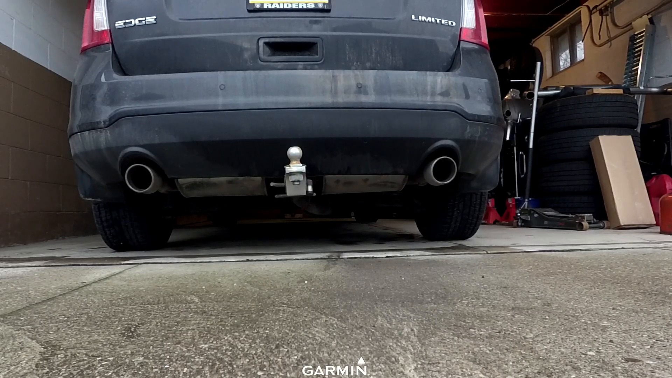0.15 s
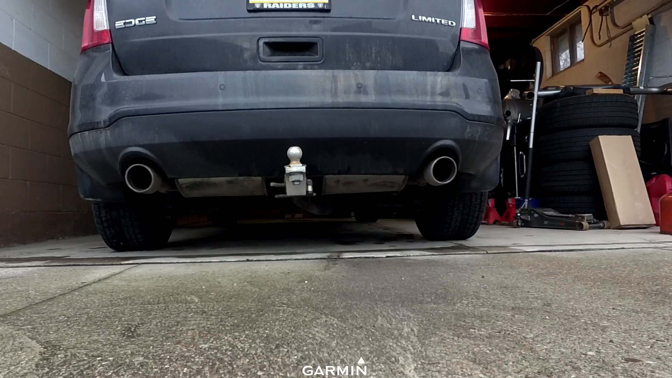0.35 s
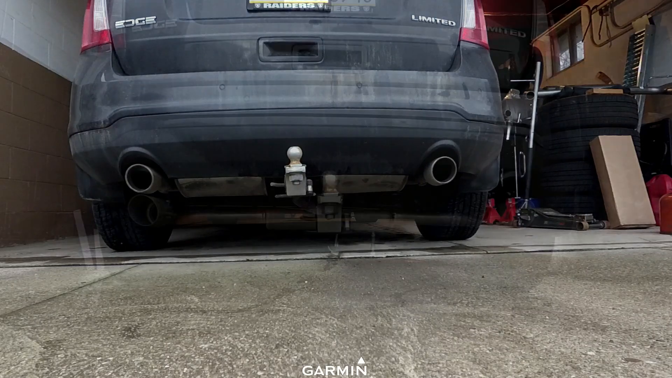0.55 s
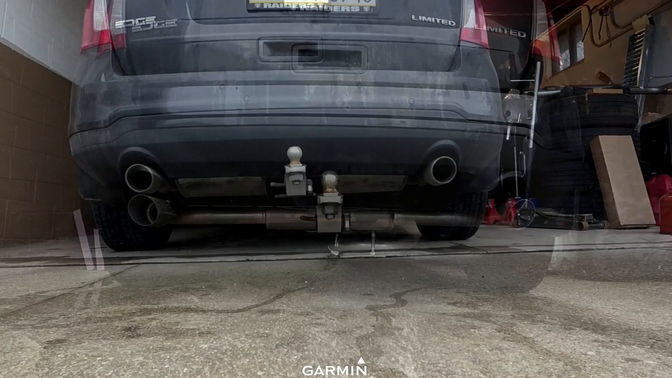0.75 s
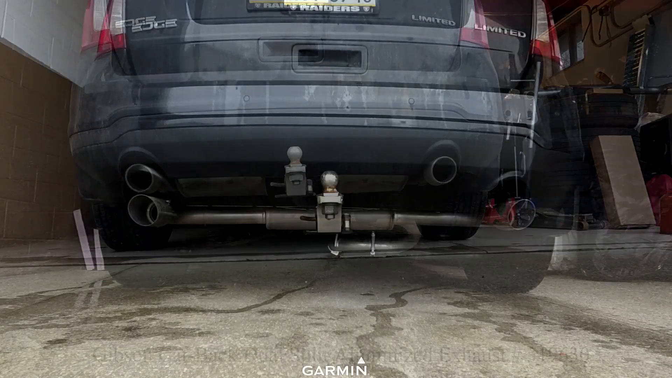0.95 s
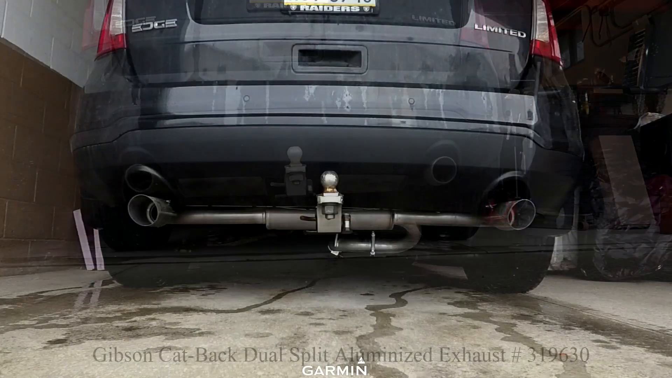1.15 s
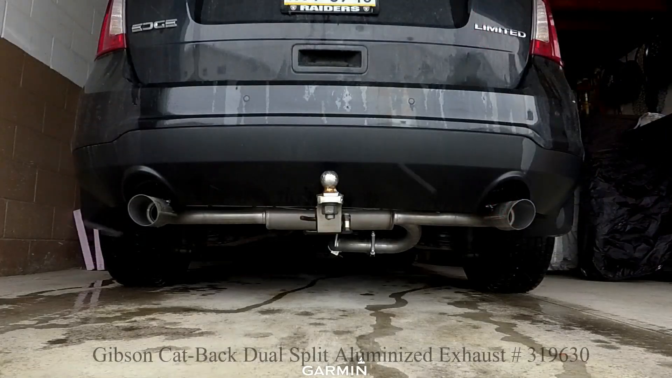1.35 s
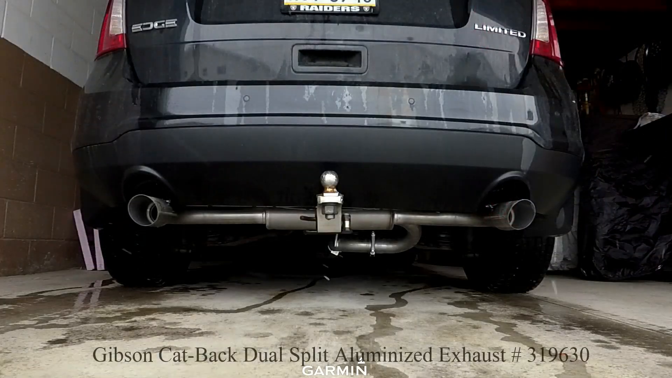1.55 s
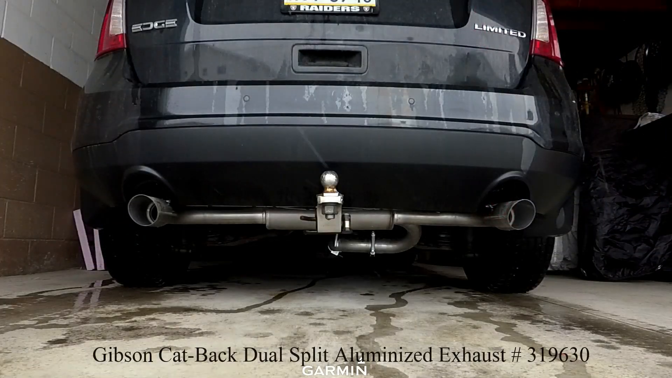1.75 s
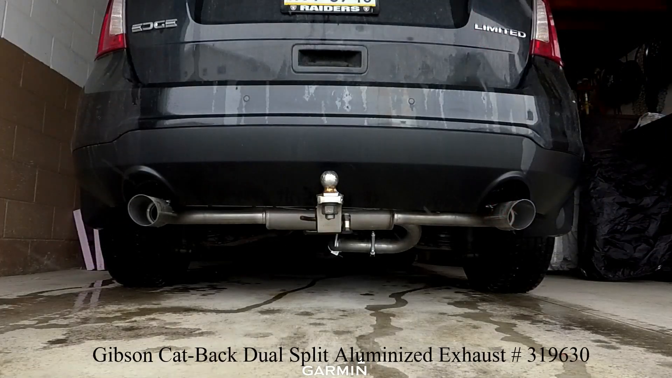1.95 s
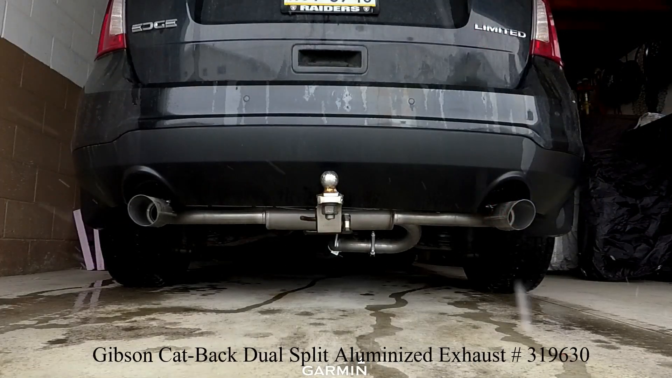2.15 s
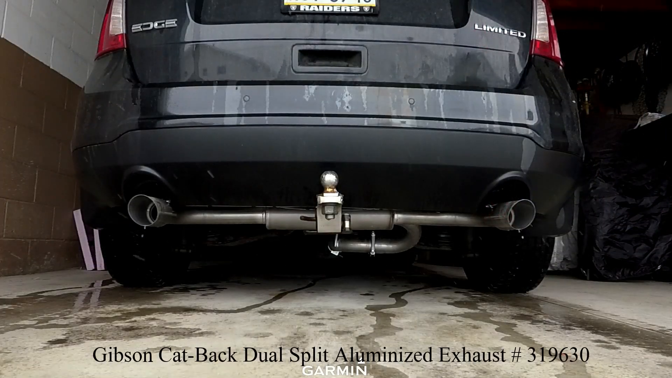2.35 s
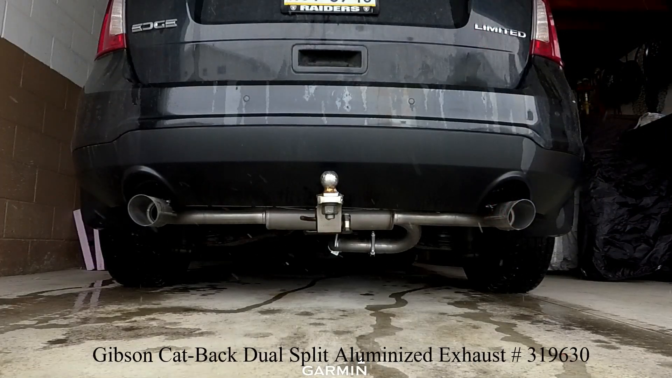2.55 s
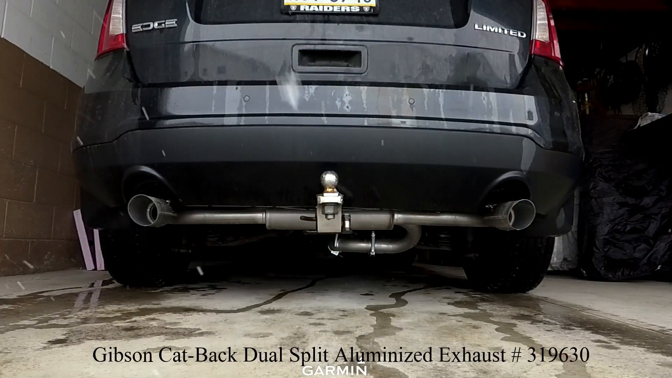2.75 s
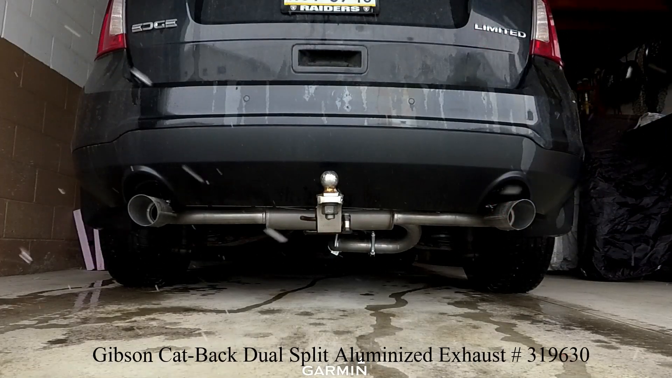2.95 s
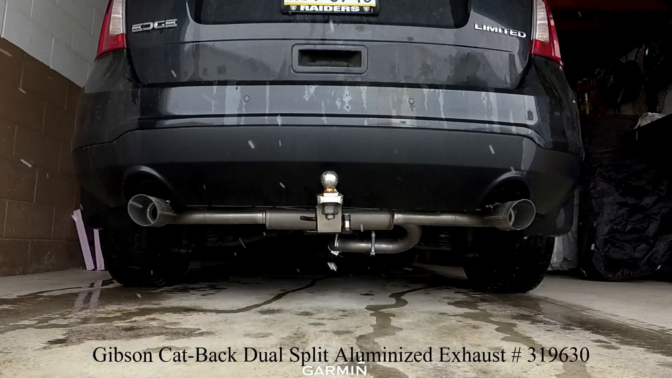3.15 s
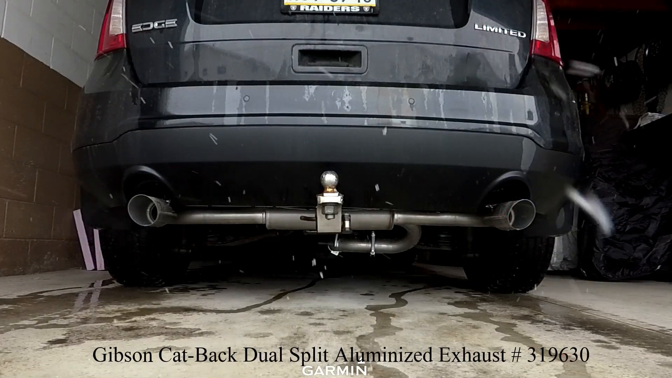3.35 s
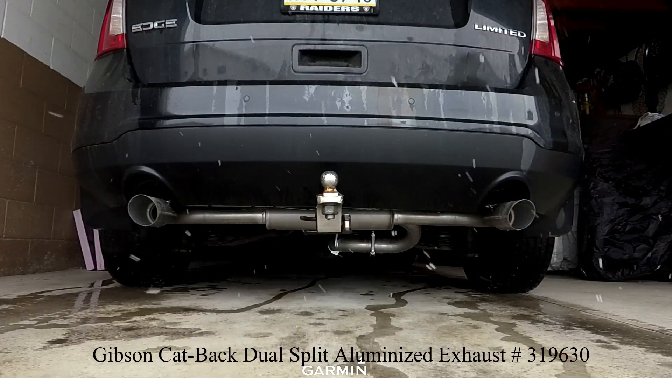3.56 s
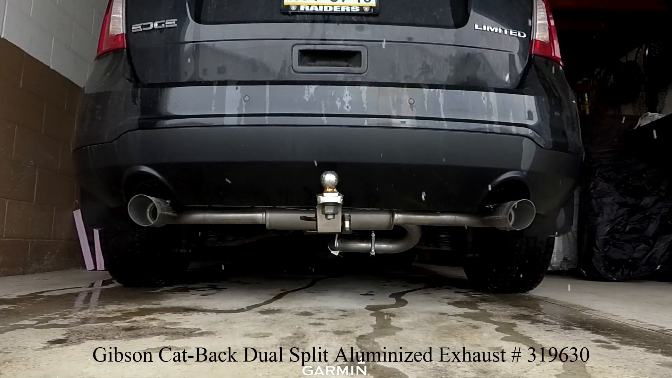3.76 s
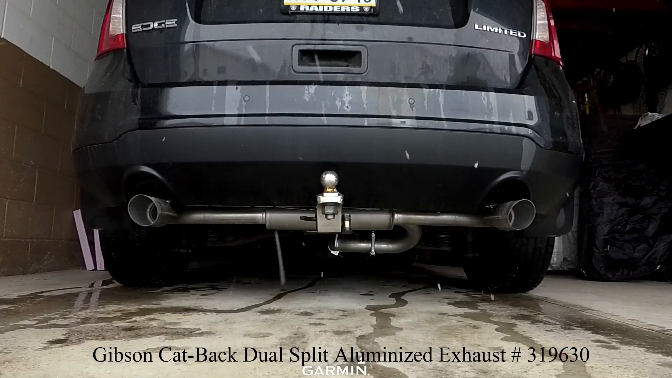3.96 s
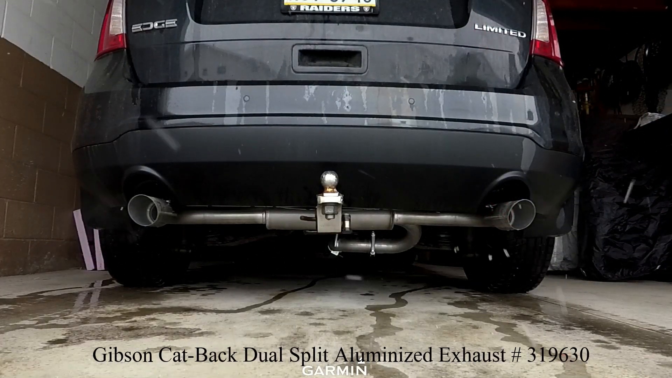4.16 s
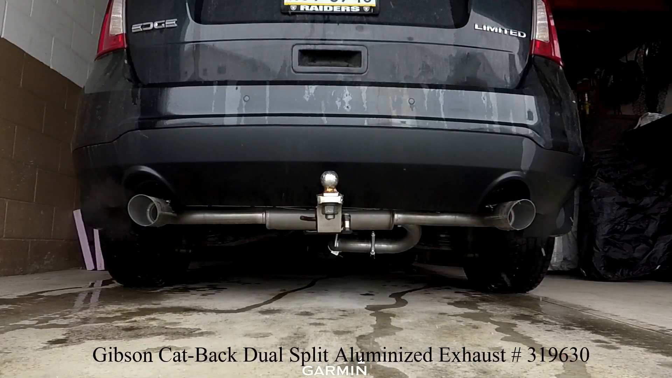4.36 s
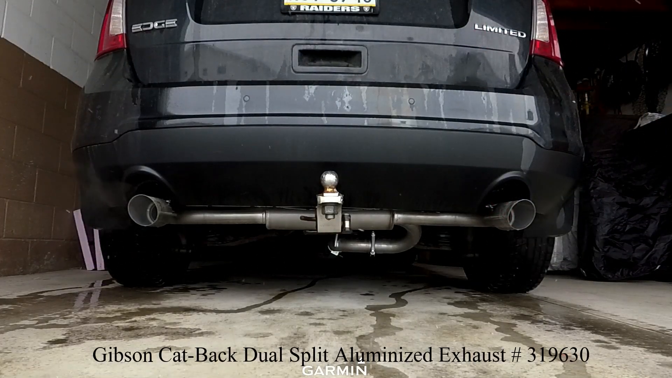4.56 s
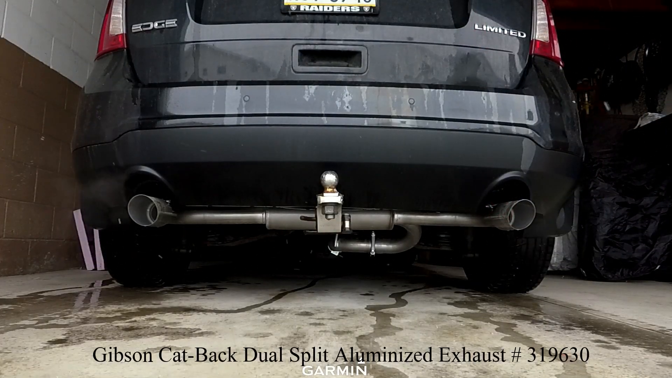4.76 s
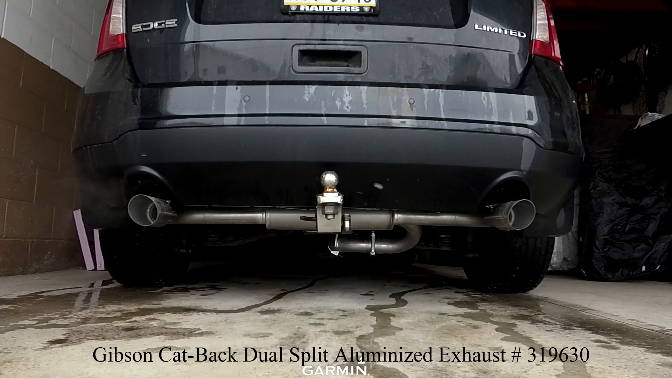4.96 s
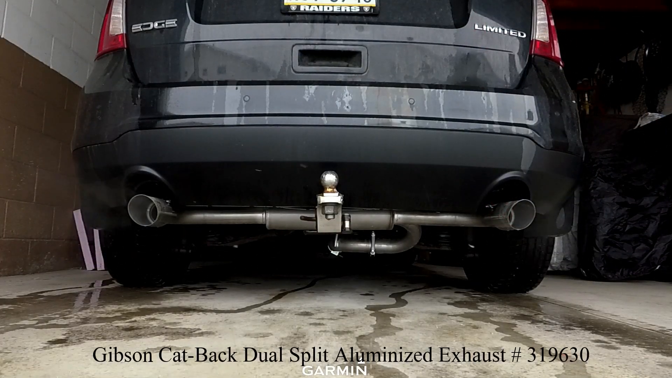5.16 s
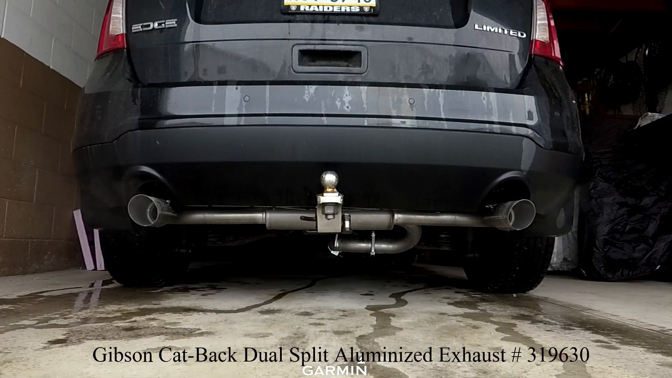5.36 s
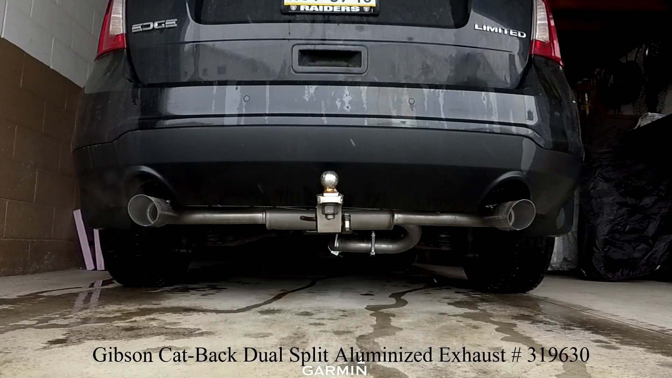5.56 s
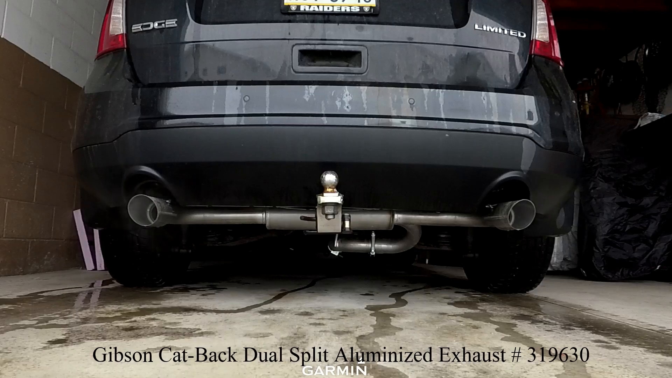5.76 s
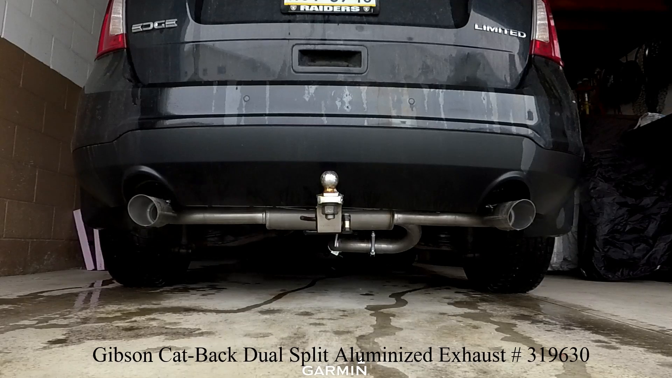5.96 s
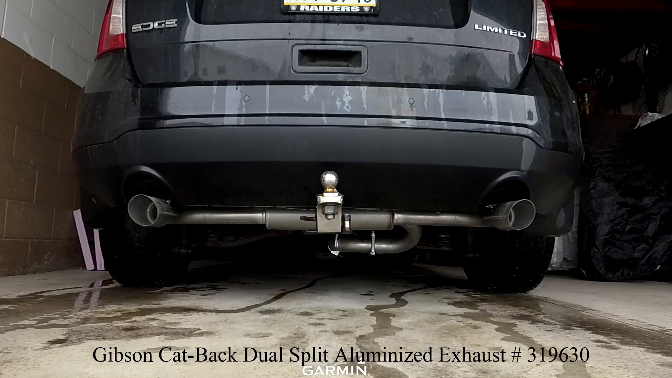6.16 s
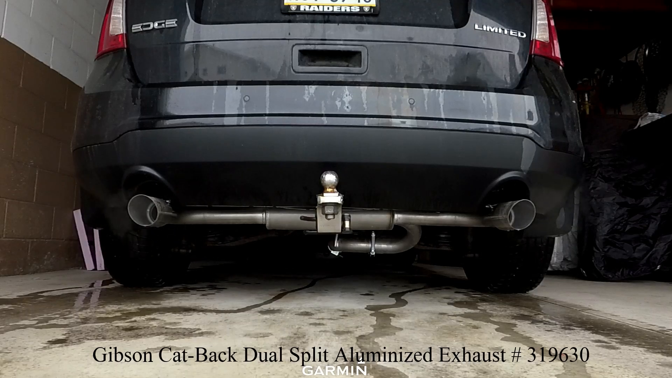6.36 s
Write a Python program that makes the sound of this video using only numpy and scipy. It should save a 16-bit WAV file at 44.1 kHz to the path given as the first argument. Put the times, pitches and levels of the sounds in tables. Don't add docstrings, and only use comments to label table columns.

```python
import sys
import numpy as np
from scipy import signal
from scipy.fft import rfft, irfft, next_fast_len
from scipy.io import wavfile
from scipy.ndimage import uniform_filter1d

SR = 44100
rng = np.random.default_rng(int(sys.argv[2]) if len(sys.argv) > 2 else 0)


def store_wav(level_fs):
    pcm = np.round(np.clip(np.atleast_2d(level_fs), -1, 1) * 32767)
    wavfile.write(sys.argv[1], SR, pcm.T.astype(np.int16))


def invert_db(level):
    return 10 ** (np.asarray(level, dtype=float) / 20)


N = 282240
T = np.arange(N) / SR

CHANGE_S = 1.4272

# start t/s, hold t/s, level/dB
GUSTS = [
    (0.028, .04, -46),
    (0.527, .04, -41),
    (0.847, .02, -20.5),
    (0.899, 0.036, -23.5),
    (0.97, .06, -23.5),
    (1.052, 0.041, -19),
    (1.277, .05, -21.5),
    (1.367, .07, -27),
    (1.19, 0.083, -35.5),
    (4.437, .02, -29),
]
# t/s, peak level/dB, f/Hz
EDDY_BURSTS = [(0.546, -12.5, 169), (0.871, -13, 224), (0.915, 1, 178), (0.931, -6, 176),
               (0.947, -3.5, 226), (0.978, -5, 173), (1.039, -4, 221), (1.059, -7.5, 203),
               (1.075, -4.5, 221), (1.096, -10, 205), (1.135, -28, 180), (1.309, -7.5, 215),
               (1.373, -15, 169), (1.386, -1, 207), (4.45, -26, 245), (4.468, -9, 261), (4.487, -17, 264)]
# f/Hz, level/dB per Hz
SOFT_GUST_COLOUR = [(15, -57), (25, -7), (48, -14.5), (81, -6.5), (146, -8), (227, -16.5), (340, -26),
                    (400, -29), (520, -55), (880, -120)]
HARD_GUST_COLOUR = [(15, -31), (25, -23), (212, 2), (375, -8), (548, -15), (663, -17), (706, -10),
                    (764, -28), (854, -15.5), (1100, -30.5), (1430, -63), (2420, -120)]
BREEZE_DB, BREEZE_LUMPS_DB, GUST_RISE_S, GUST_FALL_S = -35, 2.5, 0.013, 0.11

# f/Hz, level/dB per Hz
TRAFFIC_COLOUR = [(88, -22), (150, -9), (269, -6), (292, -15), (328, -8.5), (435, -10.5), (659, -10.5),
                  (693, -9.5), (753, -8), (819, -10.5), (1330, -15.5), (3310, -22), (8000, -42.5),
                  (10400, -69), (17600, -120)]
TRAFFIC_DB, PASSING_DB, PASSING_FADE_S = -39, 5, 0.44
# f/Hz, level/dB per Hz
RUMBLE_COLOUR = [(12, -31), (20, 0.5), (92, -9), (630, -13), (690, -8), (791, -18), (907, -7), (1020, -15),
                 (1310, -21.5), (3120, -31), (4700, -39), (6110, -83), (10300, -120)]
RUMBLE_DB, RUMBLE_RISE_DB_PER_S, RUMBLE_END_S = -39.5, 11.5, 2.41

# f/Hz, level/dB per Hz
HISS_COLOUR = [(2760, -49), (4700, -14.5), (6290, 0), (6740, -3.5), (7220, -4.5), (10400, -1),
               (12800, -8.5), (15300, -7.5)]
HISS_DB, HISS_FIRST_DB, HISS_SWELL_DB = -65, -4.5, 3
DUCK_DB, DUCK_FROM_S, DUCK_FALL_S, DUCK_RECOVER_S = -7.5, 2.48, 0.9, 1.38

# t/s, f/Hz, level/dB
WHISTLES = [
    [(.62, 5930, -68), (.9, 5950, -64), (1.17, 5970, -68)],
    [(3.0, 5980, -73), (3.6, 6200, -68), (4.0, 6560, -66), (4.25, 6720, -63), (4.7, 6720, -69),
     (6.4, 6720, -71)],
]

# t/s, peak level/dB, decay to -60 dB t/s
COMPRESSIONS = [
    (1.619, 6, 0.23),
    (1.704, -9, 0.76),
    (1.749, -7, 0.41),
    (1.883, 1, 0.27),
    (1.982, 0.5, 0.29),
    (2.078, 3.5, 0.14),
    (2.162, 2, 0.25),
    (2.305, -1.5, 0.2),
]
# f/Hz, level/dB per Hz
STARTER_COLOUR = [(280, -29), (450, -32), (620, -16), (770, -0.5), (1100, -8), (1300, -1), (1650, -13),
                  (2800, -9.5), (4100, -8), (4750, -12.5), (5050, -20), (9300, -39.5), (11500, -40),
                  (14000, -66)]
# f/Hz, level/dB per Hz
STARTER_FAST_COLOUR = [(500, -24), (830, -5), (1300, -14.5), (1700, -10.5), (3200, -2), (4700, -8.5),
                       (5100, -15.5), (9300, -31.5), (12000, -40), (14500, -68.5)]
# f/Hz, width f/Hz, level/dB
STARTER_HOUSING = [(505, 44, -0.5), (778, 17, -0.5), (916, 13, -23), (1048, 98, -4), (1275, 64, 1.5),
                   (1510, 27, -17), (1530, 79, -9.5), (1986, 40, -6.5), (2245, 29, -4), (2800, 15, -6),
                   (3294, 14, -4.5), (4150, 24, -17), (4340, 29, -6), (5440, 50, -14.5)]
ENGAGE_S, CLASH_DB, CLASH_T60_S = 1.613, -15, 0.39
GRIND_DB, OVERRUN_S, OVERRUN_DB_PER_S, RELEASE_S, RELEASE_DB_PER_S = -25.5, 2.03, 18, 2.34, -190

# t/s, firings f/Hz
FIRING = [(2.22, 36.2), (2.33, 50.3), (2.43, 67.5), (2.48, 73.5), (2.54, 76.8), (2.62, 77.9), (2.74, 75.7),
          (2.95, 66.97), (3.17, 58.9), (3.53, 46.3), (3.71, 42.3), (3.89, 39.7), (4.07, 38.2), (4.3, 37.49),
          (4.5, 37.45), (4.8, 36.35), (5.5, 35.35), (6.0, 34.35), (6.4, 34.6)]
# t/s, level over idle/dB
LOAD = [(2.22, 20), (2.28, -0.5), (2.35, 12.5), (2.52, 12), (2.7, 9), (2.82, 9), (2.91, 13), (3.05, 4),
        (3.12, 4), (3.27, 5.5), (3.4, 2), (3.8, 2), (4.02, 4), (4.42, 5.5), (5.06, 2), (5.56, 1.5),
        (5.71, -2.5), (6.4, 0.5)]
# pulse body level/dB, sharp edge level/dB
CYLINDERS = [(1.5, 3), (-6, -1), (2, 3.5), (1, -5), (-6, -5.5), (2, 3.5)]
# f/Hz, width f/Hz, level/dB, share driven by the second bank [-1 to 1]
THUMP = [(33.5, 5.7, 3, 0.68), (50.5, 5.7, 5, .4), (72.8, 8.6, -5, 0.05), (92, 10.3, -1, 0.028),
         (107, 6.7, 0.5, 0.8), (110.8, 19.3, -1.5, 0.38), (149.2, 13.6, 2.5, 0.42), (175.7, 6.3, 2, 0.64),
         (210, 8.6, -9, 0.15)]
DRONE = [(236.1, 7.5, -3, 0.73), (246.6, 7, 4.5, 1), (263.8, 10.2, 4, 0.69), (279.5, 9.8, -3, 1)]
RASP = [(315, 2.23, 3, 0.56), (334.6, 3.4, -0.5, -0.17), (364.2, 4, 0.5, -0.41), (388.8, 11, -6.5, -0.35),
        (434, 6.7, -12.5, 0.11), (439.2, 7.2, -6, -1.17), (480.8, 24.7, -8.5, -1.72)]
EDGE = [(523.5, 12.5, 0.5, 0.49), (555.3, 14.4, 0.5, 1), (598.3, 16.6, 3, 0.71), (626, 22, 1.5, 0.54),
        (749, 24, -10.5, 0.82), (891, 39, -19.5, 0.94)]
# idle level/dB, share of load [1], slope/dB per octave of speed,
# start t/s, build-up t/s
FOLLOW = [
    (-28.5, 0.27, 2, 2.23, 0.027),
    (-24.5, 0.97, 0.5, 2.22, 0.034),
    (-30, 0.51, 6.5, 2.26, 0.034),
    (-31.5, 0.47, 7, 2.1, 0.043),
    (-36.5, 0.34, 3.5, 2.28, .08),
]
# f/Hz, level/dB per Hz
BAY_COLOUR = [(390, -31.5), (660, -7), (758, -8.5), (853, -9.5), (929, -8.5), (1400, -16), (1780, -17.5),
              (3280, -19.5), (4380, -23), (4980, -34), (5540, -30.5), (7320, -42.5), (8500, -46),
              (11000, -74), (18700, -120)]
# f/Hz, level/dB per Hz
BELT_COLOUR = [(4590, -42), (7800, -7), (8520, -7.5), (8850, 0), (9280, 5.5), (11300, -14), (12500, -46),
               (16200, -65), (22000, -120)]
IDLE_HZ = 35
CALM, ROUGH_PER_OCTAVE = .9, 1.8
CATCH_S, CATCH_DB, CATCH_T60_S = 2.27, 9, 0.99
BELT_DB, BELT_FROM_S, BELT_WARM_S = -53.5, 3.26, .3
SQUEAK_S, SQUEAK_DB, SQUEAK_WIDE_S = 6.35, 11, 0.031
STIR_S, STIR_DB_PER_S = 6.24, 23


def evened(x):
    return x / np.sqrt(np.mean(x ** 2) + 1e-20)


def columns(rows):
    s, *values = np.transpose(rows)
    return [np.interp(T, s, v) for v in values]


def during(rows, fade=.01):
    since_start = T - rows[0][0] + fade
    until_end = rows[-1][0] + fade - T
    return np.clip(np.minimum(since_start, until_end) / fade, 0, 1)


def drift(smooth_s):
    size = int(smooth_s * SR)
    once = uniform_filter1d(rng.standard_normal(N), size)
    return evened(uniform_filter1d(once, size))


def swell(start, rise, hold, fall):
    return np.clip((T - start) / rise, 0, 1) * np.exp(-np.maximum(T - start - rise - hold, 0) / fall)


def coloured(x, points):
    hz, db = np.transpose(points)
    log_hz = np.log(np.fft.rfftfreq(N, 1 / SR) + 1)
    shape_db = np.interp(log_hz, np.log(hz + 1), db, left=-90, right=-90)
    return evened(irfft(rfft(x) * invert_db(shape_db), N))


def grains(per_s, spread_db):
    size = invert_db(spread_db * np.minimum(rng.exponential(1, N), 4)) * rng.choice([-1, 1], N)
    return size * (rng.random(N) < per_s / SR)


def rung(first, second, modes):
    size = next_fast_len(N + SR // 2)
    f = np.fft.rfftfreq(size, 1 / SR)
    top = np.searchsorted(f, 4000)
    f, a, b = f[:top], rfft(first, size)[:top], rfft(second, size)[:top]
    out = 0
    for k, (hz, width, db, share) in enumerate(modes):
        damping = 1j * f * width
        resonance = damping / (hz ** 2 - f ** 2 + damping)
        out = out + (-1) ** k * invert_db(db) * resonance * (a + np.clip(share, -1, 1) * b)
    return evened(irfft(out, size)[:N])


def gain_db():
    return DUCK_DB * swell(DUCK_FROM_S, DUCK_FALL_S, .15, DUCK_RECOVER_S)


def wind():
    level = invert_db(BREEZE_DB + BREEZE_LUMPS_DB * drift(0.034)) * (T < CHANGE_S)
    for s, hold, db in GUSTS:
        same_place = (T < CHANGE_S) | (s > CHANGE_S)
        level = level + invert_db(db) * swell(s, GUST_RISE_S, hold, GUST_FALL_S / 2) * same_place
    hard = np.clip((20 * np.log10(level + 1e-9) + 22) / 12, 0, 1)
    eddies = grains(600, 2.5)
    buffeting = (1 - hard) * coloured(eddies, SOFT_GUST_COLOUR) + hard * coloured(eddies, HARD_GUST_COLOUR)
    out = invert_db(1.0) * level * buffeting
    out *= 1 - np.exp(-abs(T - CHANGE_S) / .002)
    signs = rng.choice([-1, 1], len(EDDY_BURSTS))
    for (s, db, hz), sign in zip(EDDY_BURSTS, signs):
        near = slice(int((s - .02) * SR), int((s + .02) * SR))
        u = (np.pi * hz * (T[near] - s - .002)) ** 2
        out[near] += sign * invert_db(db - 4.0) * (1 - 2 * u) * np.exp(-np.minimum(u, 60))
    return out


def yard():
    passing_db = PASSING_DB * np.exp(-T / PASSING_FADE_S)
    traffic = invert_db(TRAFFIC_DB + passing_db + .6 * drift(.05))
    traffic = traffic * coloured(rng.standard_normal(N), TRAFFIC_COLOUR)
    rumble_db = RUMBLE_DB + RUMBLE_RISE_DB_PER_S * np.clip(T - CHANGE_S, 0, 1)
    rumble = invert_db(rumble_db) * coloured(rng.standard_normal(N), RUMBLE_COLOUR)
    rumble = rumble * np.clip((RUMBLE_END_S - T) / 0.074, 0, 1)
    step = invert_db(-21.5) * np.exp(np.minimum(T - CHANGE_S, 0) / .002)
    return np.where(T < CHANGE_S, traffic + step, rumble)


def hiss():
    level_db = HISS_DB + gain_db() + HISS_FIRST_DB * (T < OVERRUN_S)
    level_db = level_db + HISS_SWELL_DB * swell(2.15, .17, .02, .15)
    return invert_db(level_db + 11.5) * coloured(rng.standard_normal(N), HISS_COLOUR)


def whistles():
    out = np.zeros(N)
    for rows in WHISTLES:
        hz, db = columns(rows)
        phase = 2 * np.pi * np.cumsum(hz + 14 * drift(.015)) / SR
        out += np.sqrt(2) * invert_db(db + 1.4 * drift(.03)) * during(rows, .05) * np.sin(phase)
    return out


def starter():
    grind_db = GRIND_DB + OVERRUN_DB_PER_S * np.clip(T - OVERRUN_S, 0, RELEASE_S - OVERRUN_S)
    grind_db += RELEASE_DB_PER_S * np.maximum(T - RELEASE_S, 0)
    clash = invert_db(CLASH_DB - 60 * np.maximum(T - ENGAGE_S, 0) / CLASH_T60_S)
    power = (invert_db(2 * grind_db) + clash ** 2) * np.clip((T - ENGAGE_S) / 0.0033, 0, 1) ** 2
    for s, db, t60 in COMPRESSIONS:
        age = np.maximum(T - s, 0)
        power += (invert_db(db - 14.0 - 60 * age / t60) * (1 - np.exp(-age / 0.0095))) ** 2
    teeth = grains(9000, 1.5) * np.sqrt(power)
    rings = np.zeros(N)
    for hz, width, db in STARTER_HOUSING:
        wander_db = 4.2 * drift(.025)
        rings += invert_db(db + wander_db) * signal.lfilter(*signal.iirpeak(hz, hz / width, SR), teeth)
    rings = signal.sosfilt(signal.butter(4, [380, 6500], "band", fs=SR, output="sos"), rings)
    fast = np.clip(np.maximum((T - 2.14) / 0.15, (1.7 - T) / 0.17), 0, 1)
    rattle = (1 - fast) * coloured(teeth, STARTER_COLOUR)
    rattle = rattle + 1.05 * fast * coloured(teeth, STARTER_FAST_COLOUR)
    return np.sqrt(power.mean()) * (.8 * rattle + (.55 - .3 * fast) * evened(rings))


def exhaust(strokes, octaves, levels):
    at = np.flatnonzero(np.diff(np.floor(strokes))) + 1
    body_db, edge_db = np.array(CYLINDERS)[strokes[at].astype(int) % len(CYLINDERS)].T
    chance = rng.standard_normal((len(at), 8))
    turbulence = CALM + ROUGH_PER_OCTAVE * np.maximum(octaves, swell(2.2, .02, 0.12, .2))
    puff_shape = .3 + np.exp(-(strokes % 1) / .35)
    puffs = turbulence * evened(puff_shape * rng.standard_normal(N))
    running = T >= FIRING[0][0]
    second = np.floor(strokes) % 2
    # modes, cylinder/dB, scatter/dB, jitter/ms, gas share
    layers = ((THUMP, .12 * body_db, .6, .05, .12),
              (DRONE, body_db, 1., .05, .17),
              (RASP, -.7 * edge_db, 1.4, .1, .3),
              (EDGE, edge_db, 1.5, .2, .32))
    out = np.zeros(N)
    for k, (level, layer) in enumerate(zip(levels, layers)):
        modes, size_db, scatter_db, jitter_ms, gas = layer
        late = abs(3 + chance[:, k + 4]) * jitter_ms * turbulence[at] * SR / 1000
        pulses = np.zeros(N)
        pulses[np.minimum(at + late.astype(int), N - 1)] = invert_db(size_db + scatter_db * chance[:, k])
        drive = evened(pulses) + gas * puffs * running
        out += level * rung(drive * (1 - second), drive * second, modes)
    return out


def engine_bay(strokes, level):
    clatter = rng.standard_normal(N) + 0.17 * grains(900, 3.2)
    clatter = (1 + 0.022 * np.cos(2 * np.pi * strokes)) * clatter
    stir_db = STIR_DB_PER_S * np.maximum(T - STIR_S, 0)
    level_db = 0.69 * gain_db() + stir_db + 0.44 * drift(0.026)
    return level * invert_db(level_db) * coloured(clatter, BAY_COLOUR)


def belt():
    squeak_db = SQUEAK_DB * np.exp(-((T - SQUEAK_S) / SQUEAK_WIDE_S) ** 2)
    warm = 1 - np.exp(-(np.maximum(T - BELT_FROM_S, 0) / BELT_WARM_S))
    level = warm ** 2 * invert_db(BELT_DB + squeak_db + 0.85 * drift(.015))
    return level * coloured(rng.standard_normal(N), BELT_COLOUR)


def engine():
    rate, = columns(FIRING)
    load_db, = columns(LOAD)
    strokes = np.cumsum(rate * (T >= FIRING[0][0])) / SR + .5
    octaves = np.log2(rate / IDLE_HZ)
    levels = []
    for db, share, per_octave_db, s, build in FOLLOW:
        level_db = db + share * load_db + per_octave_db * octaves
        levels.append(invert_db(level_db) * np.clip((T - s) / build, 0, 1) ** 2)
    *exhaust_levels, bay_level = levels
    catch = swell(CATCH_S, 0.007, 0.012, CATCH_T60_S / 7)
    exhaust_levels[0] = exhaust_levels[0] * invert_db(CATCH_DB) ** catch
    return exhaust(strokes, octaves, exhaust_levels) + engine_bay(strokes, bay_level) + belt()


def scene():
    return (wind() + yard() + whistles() + starter() + engine())[None]


def band_limit(x):
    return signal.sosfilt(signal.butter(12, 16110, fs=SR, output="sos"), x)


def record(dry):
    mix = np.clip(dry + hiss(), -1, 1)
    return band_limit(mix)


dry = scene()
out = record(dry)
store_wav(out)
```